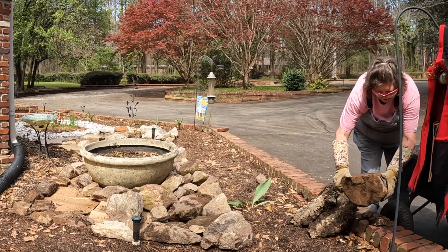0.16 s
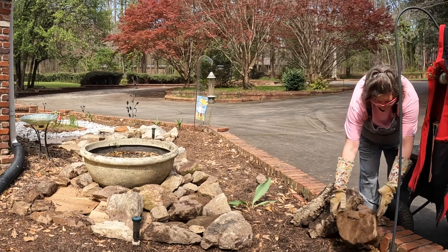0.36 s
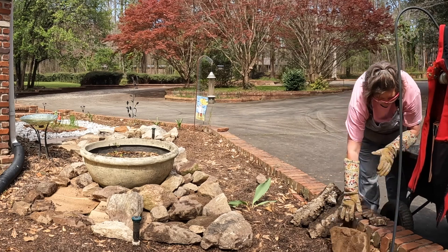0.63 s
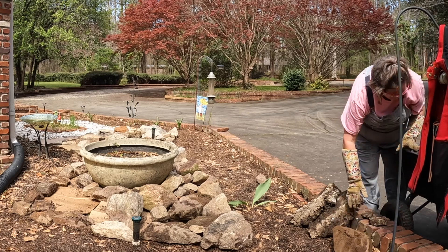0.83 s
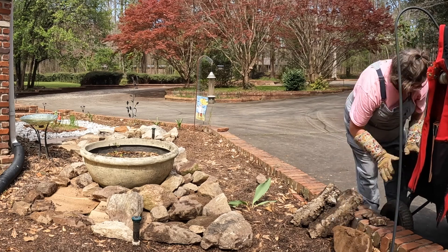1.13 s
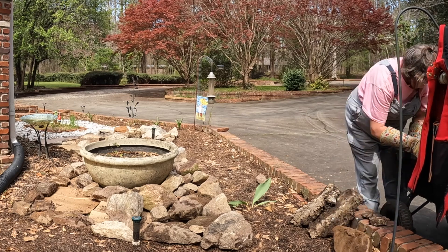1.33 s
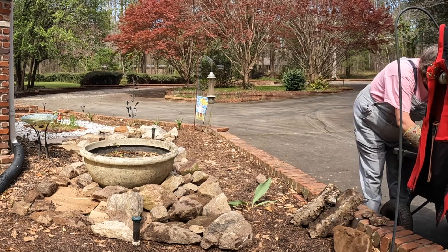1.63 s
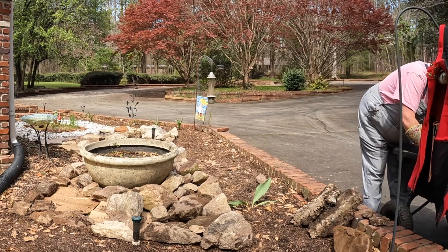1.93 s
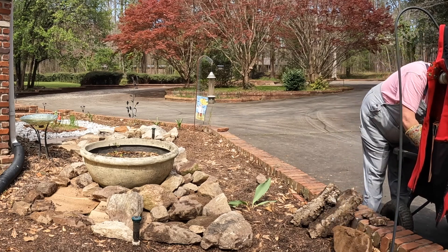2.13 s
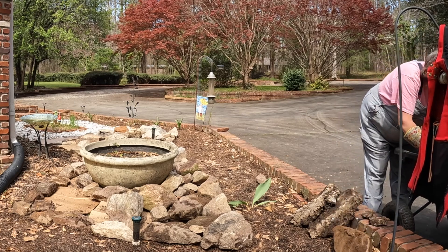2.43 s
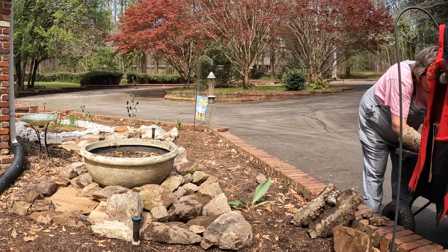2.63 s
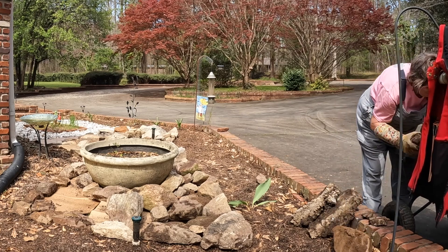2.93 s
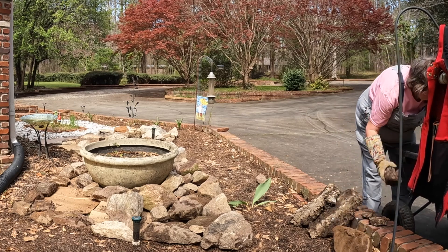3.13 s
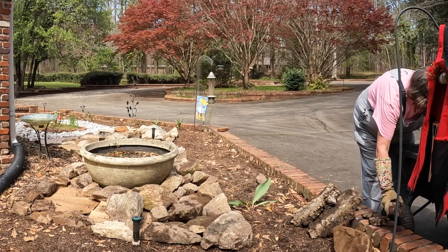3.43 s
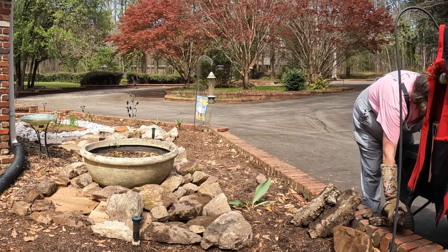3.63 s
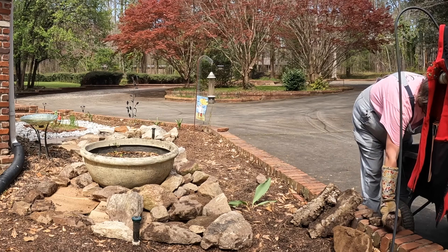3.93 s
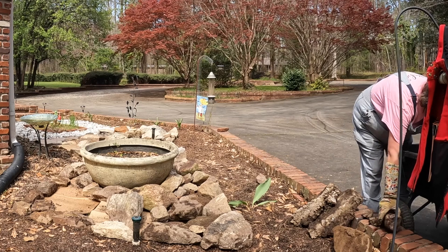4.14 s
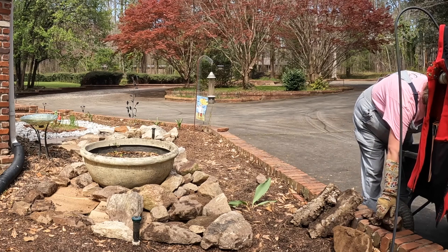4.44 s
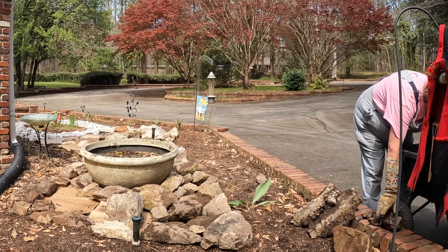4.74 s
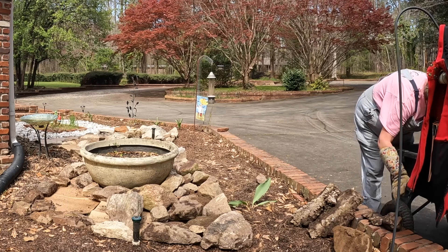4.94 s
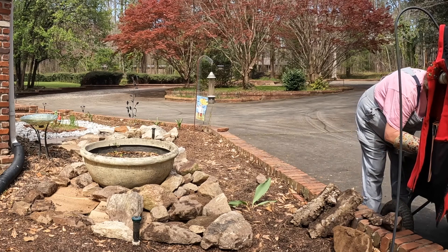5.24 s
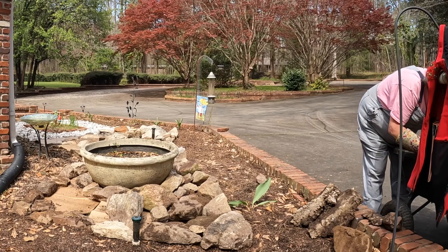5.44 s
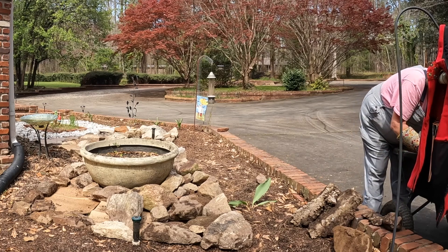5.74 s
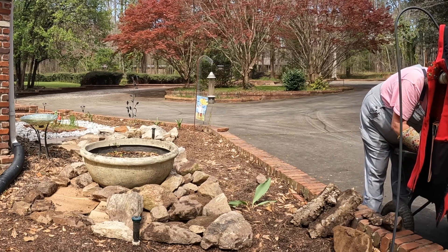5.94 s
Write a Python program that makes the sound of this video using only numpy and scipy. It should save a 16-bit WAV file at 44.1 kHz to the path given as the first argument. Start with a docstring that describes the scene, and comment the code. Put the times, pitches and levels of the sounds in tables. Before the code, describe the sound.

Outdoors, close stereo microphones, a steady low engine drone far away under soft airy hiss. A snatch of birdsong opens; at 0.2 s a rock skids and bumps dully on soil, and at 0.4 s comes a firmer thump with a sharp stony clink, scrape and crackling dry mulch. A faint bump and crackle follow at 0.9 s. From 0.9 to 2.5 s distant birds twitter, with a few clearer whistles. At 2.1 s a muffled double knock hits the wagon tub; small sways and faint rustles fill the lull. Around 3.6 s rocks tick lightly; at 3.9-4.1 s hollow thuds build, and at 4.3-4.45 s the loudest deep boom lands with a hard crack and bright chatter. Lighter knocks come at 5.05 and 5.2 s, then clustered thuds and clacks at 5.6-5.9 s, ending in slight scraping. Short echoes return from wall and yard.

```python
"""First a far engine drones under hiss and a snatch of birdsong; then dry mulch crackles and a rock bumps down.
Rocks are unloaded by hand from a garden wagon beside a driveway, close to two microphones.
They thud on the tub as damped modes, knock and clink as short ringing, and scrape as trains of slips.
Mulch is clustered snaps; a house wall and the yard return echoes, and small birds whistle far off."""
import sys
import numpy as np
from scipy import signal
from scipy.fft import rfft, irfft
from scipy.io import wavfile

SR = 44100
rng = np.random.default_rng(int(sys.argv[2]) if len(sys.argv) > 2 else 0)


def materialize(psi):
    """Save the field psi as 16-bit PCM at rate SR to the path in sys.argv[1].

    A 1-D psi becomes a single channel; in a 2-D psi each row is a channel.
    """
    bounded = np.clip(np.atleast_2d(psi).T, -1, 1)
    quanta = np.round(bounded * 32767).astype(np.int16)
    wavfile.write(sys.argv[1], SR, quanta)


N = 268126
T = np.arange(N) / SR
RING_T = T[:SR // 2]  # half a second for each blow
TUB_DETUNE, ROCK_DETUNE = 0.018, 0.051  # scatter of the modes, as a share of their pitch


def amp(db):
    """Decibels to gain."""
    return 10 ** (np.asarray(db) / 20)


def unit(x):
    """Scale to rms 1."""
    return x / np.sqrt(np.mean(x ** 2))


def filt(x, hz, kind, order=2):
    """Causal low- or high-pass."""
    sos = signal.butter(order, min(hz, SR / 2 - 1000), kind, fs=SR, output="sos")
    return signal.sosfilt(sos, x)


def colour(x, points):
    """Shape the spectrum of a sound by (f/Hz, level/dB) points."""
    hz, db = np.transpose(points)
    f = np.maximum(np.fft.rfftfreq(x.shape[-1], 1 / SR), 1)
    gain = amp(np.interp(np.log(f), np.log(hz), db))
    return irfft(rfft(x) * gain, x.shape[-1])


def walk(rate):
    """Slow chance with a spread near 1, drawn anew rate times a second and joined by straight lines."""
    knots = rng.standard_normal(N // 256)
    return np.interp(T * rate, np.arange(len(knots)), knots)


def fade(t60):
    """Free decay by 60 dB in t60 seconds."""
    return np.exp(-np.log(1000) * RING_T / t60)


def add(track, s, sound, db):
    """Lay a blow into a track at its time and peak level."""
    part = track[int(s * SR):][:len(sound)]
    part += amp(db) * sound[:len(part)] / np.abs(sound).max()


def ring(modes, pitch=1, length=1):
    """Damped modes, all started together by one blow."""
    return sum(amp(db) * fade(t60 * length) * np.sin(2 * np.pi * hz * pitch * RING_T)
               for hz, db, t60 in modes)


def detune(modes, spread):
    """Every contact loads the body differently and shifts each mode a little."""
    shifts = rng.standard_normal(len(modes))
    return [(hz * (1 + spread * shift), db, t60) for (hz, db, t60), shift in zip(modes, shifts)]


def contact(hz, rise_cycles):
    """A contact takes a share of its own cycle to build up: the softer, the slower."""
    return 1 - np.exp(-RING_T * hz / rise_cycles)


def burst(t60):
    """The dense, unresolved modes of an irregular body."""
    return rng.standard_normal(len(RING_T)) * fade(t60)


def grains(rate, spread_db):
    """Tiny fractures and slips, a few much larger than the rest."""
    size = amp(spread_db * np.minimum(rng.exponential(size=N), 4))
    return (rng.random(N) < rate / SR) * size * rng.standard_normal(N)


def swell(s, rise, fall):
    """Pressure builds up to time s and dies away."""
    return np.exp(-np.where(T < s, ((T - s) / rise) ** 2 / 2, (T - s) / fall))


# modes of the loaded tub: f/Hz, relative level/dB, t60/s at ring length 1
TUB_MODES = [(34, 0, .35), (51, -3, .2), (74, 1, .2), (101, -3, .17), (131, 0, .16), (156, 0, .15),
             (192, -2, .12), (235, -6, .09), (290, -5, .08), (388, -2, .08), (440, -3, .07), (500, -4, .06),
             (620, -4, .07), (885, -7, .06), (1040, -6, .05), (1500, -7, .07), (1880, -7, .08),
             (2680, -10, .07)]


def thuds(rattle_db=-8, rattle_t60=0.13, reach=1.31, rise_cycles=0.13):
    """A soft contact drives the low modes of the tub, a hard one the higher; the load rattles after it."""
    out = np.zeros(N)
    for s, db, hz, length in jolts():
        # modes lose level with their distance in octaves from the pitch of the contact
        driven = [(f, level - 9 * abs(np.log2(f / hz)) ** 0.38, t60)
                  for f, level, t60 in detune(TUB_MODES, TUB_DETUNE)]
        # about 300 chances a second for the load to tap the tub
        taps = burst(rattle_t60 * length) * (rng.random(len(RING_T)) < 300 / SR)
        tapped = ring(detune(TUB_MODES, ROCK_DETUNE), length=0.39)
        rattle = signal.fftconvolve(taps, tapped)[:len(RING_T)]
        rattle = filt(filt(rattle, 127, "high"), hz * 3.45, "low")
        body = ring(driven, length=length) + amp(rattle_db) * rattle
        body = body * contact(hz, rise_cycles)
        add(out, s, filt(body, hz * reach, "low"), db)
    return out


# heavy blows on the wagon: t/s, peak level at the source/dB, contact pitch f/Hz (soft = low), ring length factor
TUB_BLOWS = [(2.09, -26, 205, 0.86), (2.096, -29, 600, 3.2), (2.115, -26, 420, 1.3),
             (2.121, -35.5, 190, 2.3), (3.871, -25.5, 143, 2), (3.897, -21, 102, 0.47),
             (3.958, -19, 208, 1.7), (3.966, -12, 145, 1.27), (3.989, -19.5, 138, 2.6), (4.06, -33, 300, 2),
             (4.122, -30, 146.5, 3.1), (4.222, -31, 138, 5.5), (4.321, -19.5, 400, 2.8),
             (4.347, -10, 127.5, 1.03), (4.37, -8, 74, 0.5), (4.411, -25, 320, 0.81),
             (4.45, -29, 167, 0.93), (4.764, -34.5, 171, 1.06), (5.047, -22.5, 670, 0.52),
             (5.156, -28, 263, 2.7), (5.185, -25.5, 162, 1.6), (5.582, -26, 133, 3.9), (5.736, -28, 490, 1),
             (5.746, -21, 600, 2.2), (5.765, -25, 199, 2), (5.867, -24.5, 573, 0.88),
             (5.87, -20, 179, 1.33), (5.876, -21.5, 452, 0.9)]
# the wagon sways on its tyres as the weight shifts: t/s, peak level at the source/dB
WAGON_SWAYS = [(2.513, -21), (3.071, -24), (4.395, -11), (4.482, -23.5), (5.757, -23)]
SWAY_HZ, SWAY_LENGTH = 34.6, 1  # contact pitch, ring length as a factor
# after a blow the load settles in two weaker, softer jolts: mean gap, step in level, step in pitch
SETTLE_GAP_S, SETTLE_DB, SETTLE_PITCH = 0.036, -13.5, 0.72


def jolts():
    """All that shakes the tub, as (s, dB, Hz, length): blows, the load settling after each, and sways."""
    rows = [(s, db, SWAY_HZ, SWAY_LENGTH) for s, db in WAGON_SWAYS]
    gap_scales = rng.uniform(.6, 1.4, (len(TUB_BLOWS), 2))
    for (s, db, hz, length), gaps in zip(TUB_BLOWS, gap_scales):
        rows.append((s, db, hz, length))
        for k, wait in enumerate(SETTLE_GAP_S * np.cumsum(gaps), 1):
            rows.append((s + wait, db + k * SETTLE_DB, hz * SETTLE_PITCH ** k, 1))
    return rows


# rock on rock: t/s, peak level at the source/dB, pitch factor, hardness of the contact f/Hz
ROCK_KNOCKS = [(.396, -26, 0.66, 2200), (2.1, -29, 0.688, 1760), (2.109, -29, 1.1, 3600),
               (3.537, -46.5, .65, 1100), (3.6, -47.5, 0.99, 1800), (3.623, -47, 1.25, 2400),
               (3.658, -41.5, 1.6, 5530), (3.778, -43.5, 0.76, 1230), (3.826, -43.5, 0.86, 746),
               (3.884, -40, 0.73, 900), (3.934, -54, .7, 1000), (3.957, -35, 0.8, 1400),
               (3.973, -53, 1.2, 2400), (4.312, -16, 1.005, 3050), (4.329, -43, 0.96, 1400),
               (4.349, -30, .7, 1500), (4.368, -36, 0.64, 1200), (4.622, -44.5, 1.13, 2110),
               (4.99, -44, 0.74, 2520), (5.048, -25.5, 0.656, 3830), (5.581, -48, 0.96, 1500),
               (5.704, -42, 0.7, 1680), (5.735, -36, 0.56, 1400), (5.744, -45, 0.61, 1410),
               (5.759, -30.5, 1.1, 2300), (5.764, -36.5, 1.5, 2270), (5.779, -32.5, 0.92, 2400),
               (5.866, -30, 0.94, 2750), (5.871, -26.5, 0.613, 1690), (5.897, -47, 0.86, 1700)]
# modes of a hand-sized rock lying among others: f/Hz at pitch 1, relative level/dB, t60/s
ROCK_MODES = [(1020, -5, .02), (1280, -4, .022), (1490, 0, .025), (1850, 0, .017), (2550, -6, .012),
              (2800, -8, .01), (4400, -6, .009), (4950, -9, .009)]


def knocks(crack_db=0, crack_hz=2600, rise_cycles=0.445, tub_db=-9):
    """Rocks ring for milliseconds without bass, cracking if hard, tocking if soft; the tub rings on."""
    out = np.zeros(N)
    for s, db, pitch, hard_hz in ROCK_KNOCKS:
        crack_gain = amp(crack_db) * min(hard_hz / crack_hz, 1.2) ** 2
        crack = crack_gain * filt(burst(.007), 6500, "low")
        tone = ring(detune(ROCK_MODES, ROCK_DETUNE), pitch)
        tone = tone + amp(tub_db) * ring(detune(TUB_MODES, TUB_DETUNE))
        tone = tone * contact(hard_hz, rise_cycles)
        no_bass = filt(tone + crack, 750 * pitch, "high", order=4)
        add(out, s, filt(no_bass, hard_hz, "low"), db)
    return out


# a sharp edge chatters on stone: t/s, peak level at the source/dB
EDGE_TOUCHES = [(.294, -38), (0.403, -28), (4.405, -33.5), (4.416, -31), (4.42, -20.5), (4.423, -24.5),
                (4.432, -32.5), (5.051, -46), (5.865, -44)]
# modes of the edge: f/Hz, relative level/dB, t60/s of the free edge (halved on stone)
EDGE_MODES = [(3100, -6, .025), (3420, -3, .03), (3830, -4, .02), (4260, -2, .02), (4820, 0, .03),
              (5660, -3, .025), (6150, -6, .025), (7130, -5, .025), (9520, -12, .02), (11100, -10, .018)]


def clinks():
    """An edge skips over stone; grit rattles it briefly at every touch."""
    grit_colour = [(2000, 1.5), (2900, -25.0), (4500, -4.0), (7000, -25.5),
                   (8500, -20.0), (11000, -22.0), (13000, -17)]  # f/Hz, level/dB
    out = np.zeros(N)
    for s, db in EDGE_TOUCHES:
        tone = ring(detune(EDGE_MODES, ROCK_DETUNE), length=0.5)
        grit = colour(burst(0.064), grit_colour)
        touch = unit(tone) + amp(5) * unit(grit)
        touch = filt(touch, 2870, "high", order=5)
        add(out, s, filt(touch, 12000, "low", order=4), db)
    return out


# spectrum of rock rubbing on rock: f/Hz, relative level/dB
RUB_COLOUR = [(150, 7), (250, 6), (799, -3.5), (1300, -0.5), (1950, 2), (2200, 0.5), (3130, 1), (4680, 2.5),
              (6670, -42), (7630, 1), (8450, -22), (10300, -38), (14000, -59)]


def scrapes(rock_db=-10, tub_db=-15.0):
    """Rough faces catch and slip in fits, each slip ringing rock and tub; light pressure sounds duller."""
    slips = grains(4500, 3.0)
    slips = slips * amp(2.5 * walk(84))
    rock, tub = (signal.fftconvolve(slips, ring(modes))[:N] for modes in (ROCK_MODES, TUB_MODES))
    tub = filt(tub, 330, "high", order=4)
    rub = unit(colour(slips, RUB_COLOUR)) + amp(rock_db) * unit(rock) + amp(tub_db) * unit(tub)
    return sum(amp(db) * swell(s, rise, fall) * unit(filt(rub, hz, "low"))
               for s, rise, fall, db, hz in rubs())


# a rock is dragged over others: t/s of the peak, fall/s, rms level at the peak/dB, brightness f/Hz
ROCK_DRAGS = [(0.332, 0.042, -52.5, 3080), (0.398, 0.014, -31.5, 4130), (0.906, 0.018, -53, 4600),
              (2.104, 0.018, -44, 4700), (2.601, 0.042, -55, 3300), (3.64, 0.015, -61, 2830),
              (3.976, 0.15, -57.5, 1720), (4.27, 0.098, -58, 2930), (4.353, 0.07, -50.5, 2420),
              (5.761, 0.068, -51.5, 1910), (6.0, 0.24, -56, 2300)]
DRAG_RISE = 0.44  # build-up as a share of the fall
# a rock is caught and skids to a stop: t/s, rms level at the peak/dB
ROCK_SKIDS = [(0.21, -49), (2.049, -46.5), (3.429, -52)]
SKID_RISE_S, SKID_FALL_S, SKID_HZ = 0.0055, 0.098, 2780
# every blow makes the load slip: level against the blow, fall per unit of ring length, brightness
SLIP_DB, SLIP_FALL_S, SLIP_HZ = -32.5, 0.019, 1600


def rubs():
    """All sliding of rock, as (s, rise s, fall s, dB, Hz): drags swell, skids and slips start fast."""
    drags = [(s, DRAG_RISE * fall, fall, db, hz) for s, fall, db, hz in ROCK_DRAGS]
    skids = [(s, SKID_RISE_S, SKID_FALL_S, db, SKID_HZ) for s, db in ROCK_SKIDS]
    slips = [(s, SKID_RISE_S, SLIP_FALL_S * length, db + SLIP_DB, SLIP_HZ)
             for s, db, _, length in TUB_BLOWS]
    return drags + skids + slips


# dry mulch crushed by rocks, boots and gloves: t/s of the start, length of the push/s, rms level before easing/dB
MULCH_PUSHES = [(0.097, 0.0018, -56.5), (0.15, 0.0034, -61.5), (.23, 0.13, -59), (0.389, 0.0094, -47),
                (.41, 0.13, -57), (.55, 0.1, -60), (0.695, 0.009, -60.5), (0.889, 0.021, -54),
                (1.128, 0.0033, -57.5), (1.348, 0.12, -65.5), (2.799, 0.022, -61), (2.909, 0.025, -65),
                (2.961, 0.0023, -65), (3.425, 0.019, -65), (3.56, 0.11, -68), (3.65, 0.0055, -59),
                (4.44, 0.0075, -63), (4.986, 0.0088, -59), (5.048, 0.033, -67.5), (5.863, 0.0018, -43.5)]
# spectrum of crackling bark and leaves: f/Hz, relative level/dB
CRACKLE_COLOUR = [(530, -63), (900, -7), (1660, -6), (2130, -12.5), (3170, -7), (6660, -7.5), (7580, -10),
                  (8430, -20), (10400, -13.5), (13700, -27), (15000, -54)]
GRIT_DB = -11  # dirt crushed in a scrape, against the scrape, at the brightness of a skid


def mulch(cluster_db=3.0):
    """Bark and leaves crackle in clusters under pushes, dirt under sliding rock; chip size sets the band."""
    snaps = 0
    for hz in 750 * 2. ** np.arange(5):  # one octave for each size of chip
        chips = grains(3200, 3.6) * amp(cluster_db * walk(55))
        snaps = snaps + filt(filt(chips, hz / np.sqrt(2), "high"), hz * np.sqrt(2), "low")
    crackle = unit(colour(snaps, CRACKLE_COLOUR))
    pushes = sum(amp(db) * push(start, length) for start, length, db in MULCH_PUSHES)
    dirt = sum(amp(db + GRIT_DB) * hz / SKID_HZ * swell(s, rise, fall)
               for s, rise, fall, db, hz in rubs())
    return crackle * (pushes + dirt)


# a push builds over a share of its length, eases, then lets go, the longer ones more slowly
PUSH_BUILD, PUSH_EASE_DB_PER_S, PUSH_RELEASE_S, PUSH_LIFT = 0.25, 20, 0.0072, 0.78


def push(start, length):
    """Weight bears on the mulch, eases and lifts."""
    t = np.maximum(T - start, 0)
    build = np.minimum(t / (PUSH_BUILD * length), 1)
    release = PUSH_RELEASE_S + PUSH_LIFT * length
    lift = np.exp(-np.maximum(t - length, 0) / release)
    return build * amp(-PUSH_EASE_DB_PER_S * t) * lift


# a rock bumps down on soft ground: t/s, peak level at the source/dB, f/Hz, t60/s
GROUND_BUMPS = [(0.205, -26.5, 101.4, 0.36), (0.387, -18, 202, 0.018), (0.409, -17, 53, 0.075),
                (0.44, -22, 96, 0.16), (0.892, -36.5, 102.8, 0.61)]


def bumps(rise_cycles=0.34):
    """The soil gives gradually under a heavy rock and swings back."""
    out = np.zeros(N)
    for s, db, hz, t60 in GROUND_BUMPS:
        add(out, s, ring([(hz, 0, t60)]) * contact(hz, rise_cycles), db)
    return out


def place(x, pan_db, lag):
    """Two close microphones: only the middle band differs in level; the left lags by some samples."""
    shade = np.array([(120, 0), (400, 1), (5500, 1), (8000, 0)])  # f/Hz, share of the pan
    # a positive pan favours the left
    left, right = (colour(x, shade * [1, sign * pan_db / 2]) for sign in (1, -1))
    delay = np.exp(-2j * np.pi * np.fft.rfftfreq(N) * lag)
    return np.array([irfft(rfft(left) * delay, N), right])


def yard(x, wall_s=0.009, wall_db=-14, near_db=-11, far_db=-22):
    """The house wall on the left echoes once; paving, shrubs and trees scatter the rest."""
    x = filt(filt(x, 430, "high"), 13000, "low", order=1)
    onset = np.minimum(RING_T / 0.0048, 1)
    tails = []
    for _ in range(2):  # left, right
        scatter = amp(near_db) * unit(burst(0.25)) + amp(far_db) * unit(burst(0.8))
        tails.append(onset * scatter / np.sqrt(len(RING_T)))
    left, right = (signal.fftconvolve(x, tail)[:N] for tail in tails)
    wall = np.interp(T - wall_s, T, filt(x, 2100, "low"))
    return np.array([left + amp(wall_db) * wall, right])


# far birdsong: start t/s, end t/s, typical note's peak level before the blur/dB, central f/Hz
FAR_SONGS = [(0, 0.152, -65.5, 5020), (0.931, 2.049, -68, 4860), (1.721, 2.499, -68, 3004),
             (2.692, 3.268, -75, 5410), (3.778, 3.887, -66.5, 5330), (4.47, 4.893, -74, 4910)]
# slurred notes of a nearer bird: t/s, direct peak level/dB, from f/Hz, to f/Hz
NEAR_CHIRPS = [(0.964, -65, 4150, 4920), (1.185, -63, 4250, 5140), (1.206, -69, 5000, 4160),
               (1.566, -67.5, 5680, 4420), (1.619, -66, 3800, 4480), (4.843, -79, 4600, 5740)]
CHIRP_S = 0.0481  # length of each near note


def birds(blur_db=2):
    """A far chorus twitters, blurred by the trees; one nearer bird slurs clear notes over it."""
    far, near = np.zeros((2, N))
    for start, end, db, hz in FAR_SONGS:
        count = int((end - start) * 220)  # notes at 220 a second
        for k, (when, height, glide, loud) in enumerate(rng.uniform(-1, 1, (count, 4))):
            from_hz = hz * np.exp(.17 * height - .2 * glide)
            to_hz = hz * np.exp(.17 * height + .2 * glide)
            s = start + (end - start) * (k + 1 + when) / count
            add(far, s, chirp(from_hz, to_hz, .012), db + 4 * loud ** 3)
    for s, db, from_hz, to_hz in NEAR_CHIRPS:
        add(near, s, chirp(from_hz, to_hz, CHIRP_S), db)
    leaves = [burst(.22) for _ in range(2)]  # left, right
    chorus = far + amp(blur_db) * near
    blurred = [signal.fftconvolve(chorus, tail / np.linalg.norm(tail))[:N] for tail in leaves]
    return near + np.array(blurred)


def chirp(from_hz, to_hz, length):
    """One gliding whistle."""
    pitch = np.geomspace(from_hz, to_hz, int(length * SR))
    return np.hanning(len(pitch)) * np.sin(2 * np.pi * np.cumsum(pitch) / SR)


# lines of the far engine: f/Hz, rms level about which it wavers/dB
ENGINE_LINES = [(37, -44.5), (50.5, -46.5), (101.5, -49.5), (203, -68), (303, -74.5)]


def drone():
    """A far engine whose lines waver on their way through the air."""
    turns = np.cumsum(1 + 0.0141 * walk(5.3)) / SR  # one waver of pitch shared by all lines
    return sum(amp(db + 2.4 * walk(6)) * np.sqrt(2) * np.sin(2 * np.pi * (hz * turns + rng.random()))
               for hz, db in ENGINE_LINES)


# spectrum of the outdoor air: f/Hz, relative level/dB
AIR_COLOUR = [(12, -73), (20, -10), (78, -1), (132, -9), (278, -27), (398, -24.5), (865, -36), (1080, -29),
              (1350, -27), (2480, -42), (3970, -45), (5380, -43.5), (8620, -55.5), (10500, -55.5),
              (15000, -71)]
AIR_DB = -61  # rms of the shared part from 300 to 3000 Hz, before the trim
# course of the treble hiss: t/s, relative level/dB
HISS_COURSE = [(.8, 2), (1.9, 0.5), (3.3, -4), (4.4, 1.5), (5.45, -5), (6, 6.5)]


def air(trim_db=-1.5):
    """Outdoor rumble and hiss: the bass alike in both ears; the hiss of the leaves comes and goes."""
    mid, side = colour(rng.standard_normal((2, N)), AIR_COLOUR)
    band = filt(filt(mid, 300, "high", order=6), 3000, "low")
    scale = amp(AIR_DB) / np.std(band)
    width = amp(-3.5) * filt(side, 540, "high", order=1) * np.array([[1], [-1]])
    both = scale * (mid + width)
    hiss = colour(both, [(1500, -40), (3500, 0)])
    breeze = amp(np.interp(T, *np.transpose(HISS_COURSE)) + 2.5 * walk(8) - 1.5)
    return amp(trim_db) * (both + (breeze - 1) * hiss)


def scene():
    """Work at the wagon, its echoes and the surroundings."""
    tub, stone, edge, rubbing, litter = thuds(), knocks(), clinks(), scrapes(), mulch()
    direct = place(tub, 2.5, 0.5) + place(stone, -5.5, 1.0) + place(edge, -7.5, 0.36)
    direct = direct + place(rubbing, 1.0, 2.97) + place(litter, -4.0, 0.076)
    echoes = yard(tub + stone + edge + rubbing + litter)
    return direct + bumps() + echoes + birds() + drone() + air()


TOP_HZ = 14900


def record(dry):
    """The microphone channel drops the deepest bass gently and cuts the top steeply."""
    no_rumble = filt(dry, 57.0, "high", order=1)
    return signal.sosfilt(signal.ellip(8, .2, 70, TOP_HZ, fs=SR, output="sos"), no_rumble)


dry = scene()
out = record(dry)
materialize(out)
```